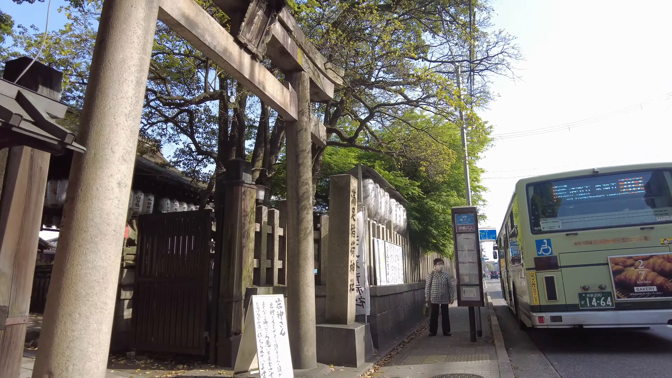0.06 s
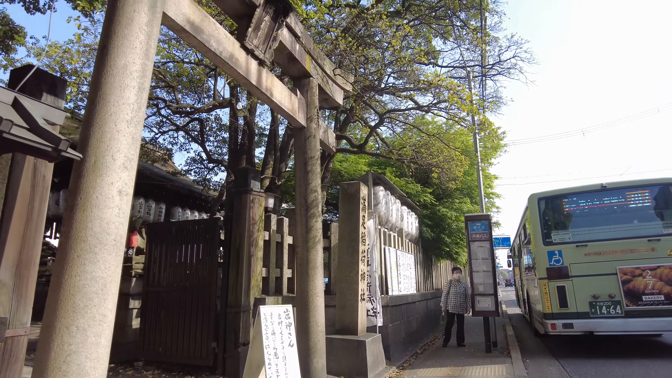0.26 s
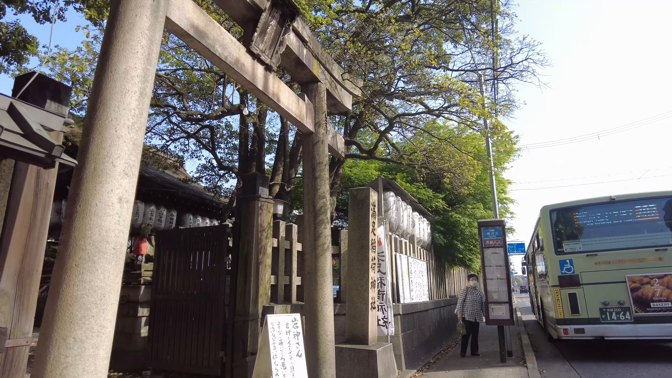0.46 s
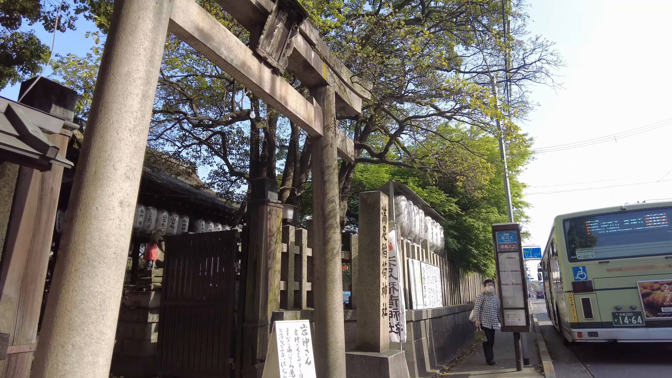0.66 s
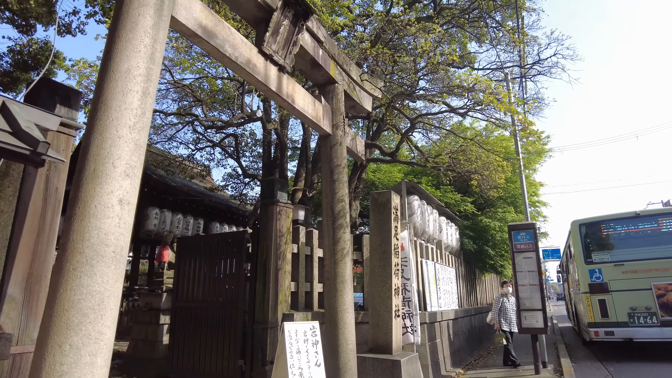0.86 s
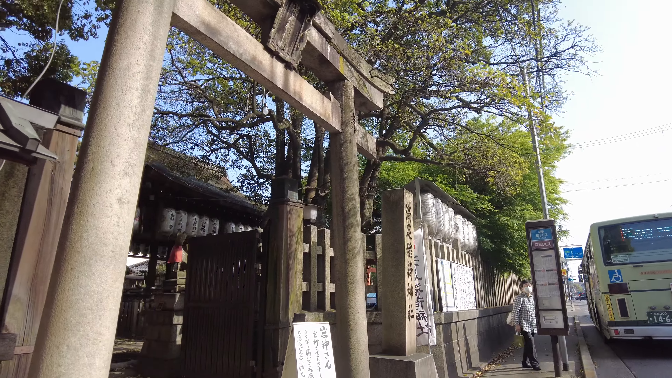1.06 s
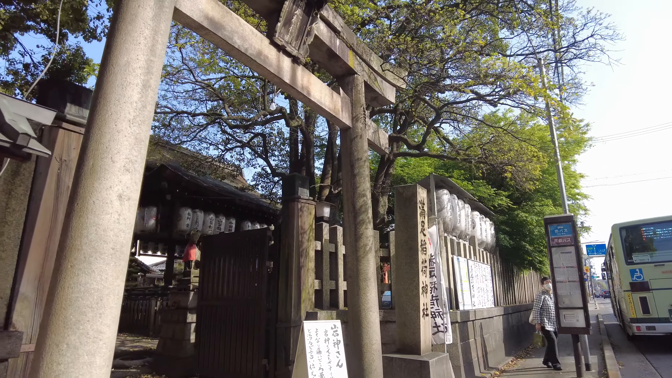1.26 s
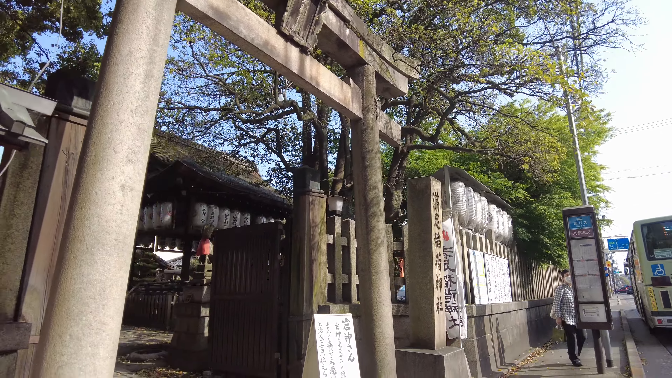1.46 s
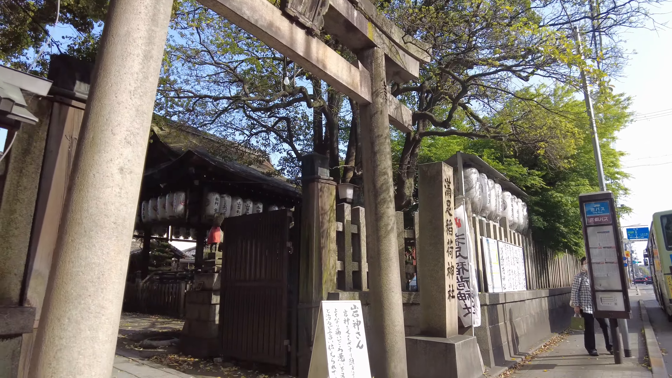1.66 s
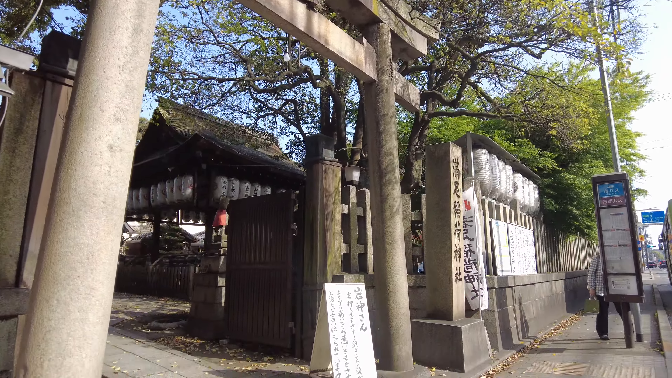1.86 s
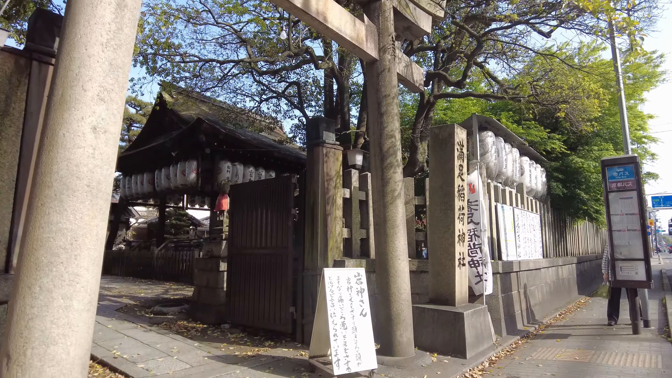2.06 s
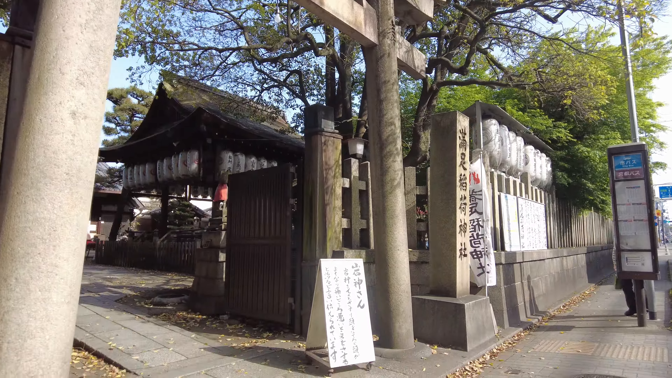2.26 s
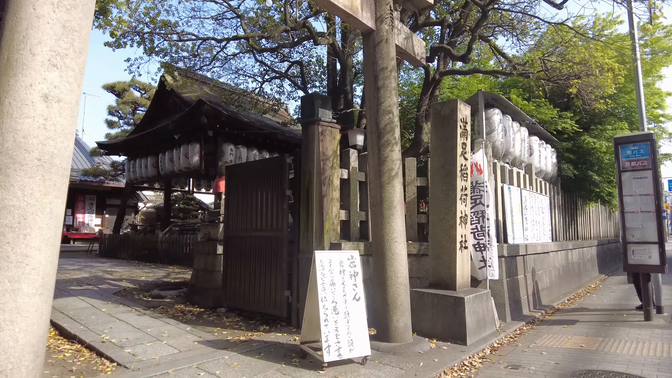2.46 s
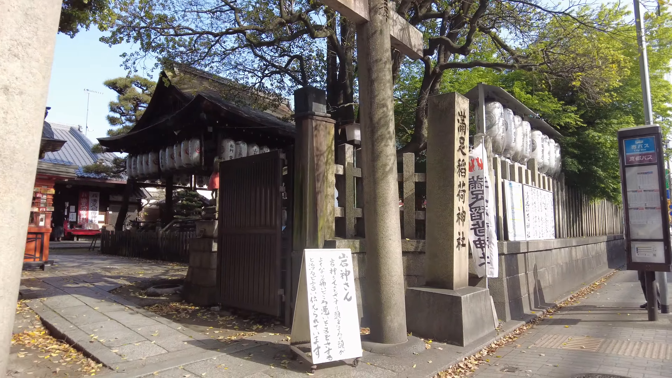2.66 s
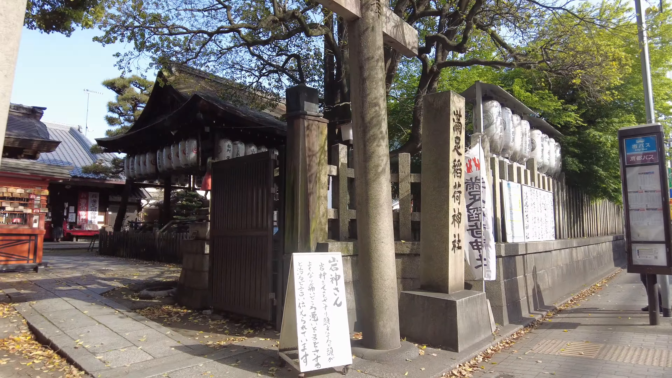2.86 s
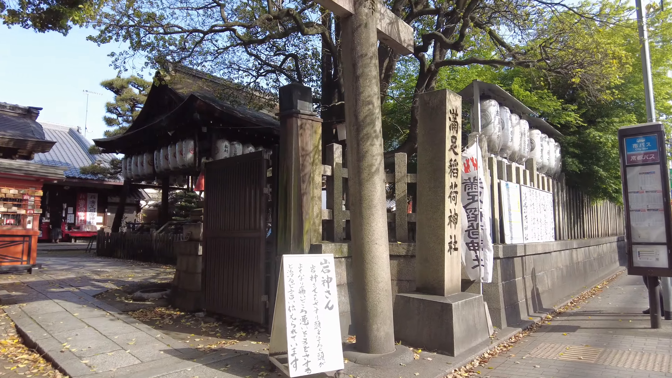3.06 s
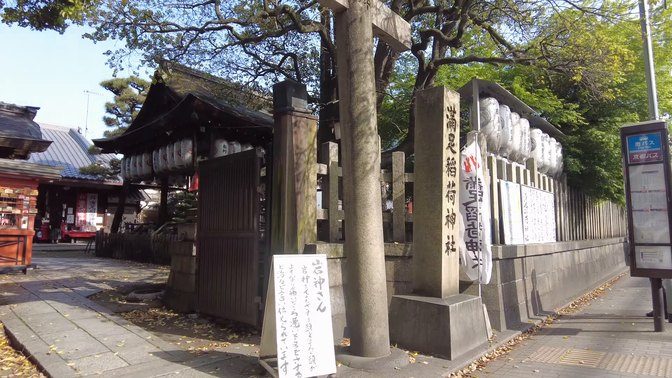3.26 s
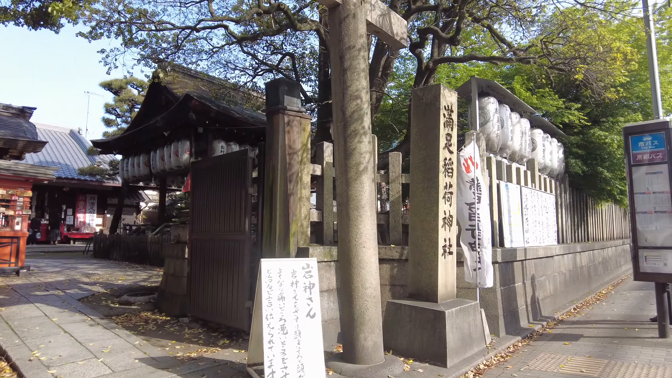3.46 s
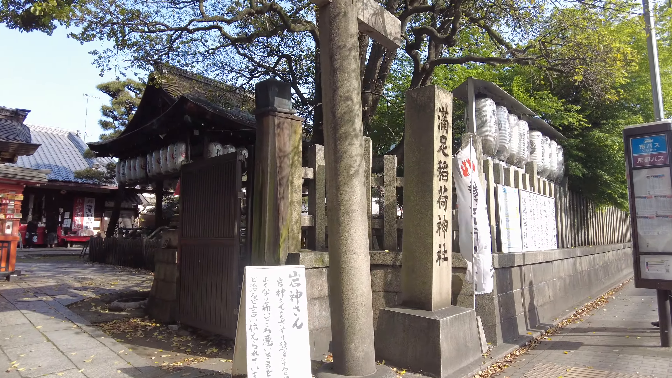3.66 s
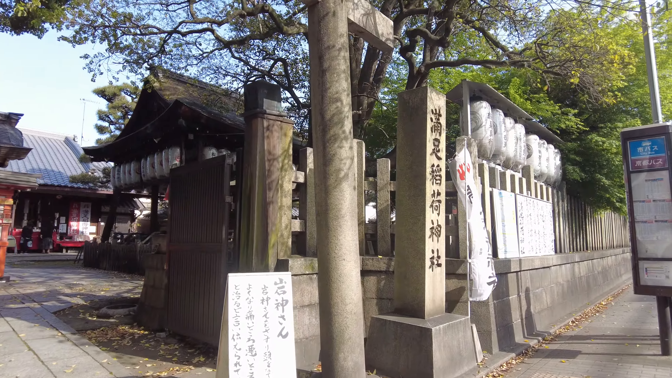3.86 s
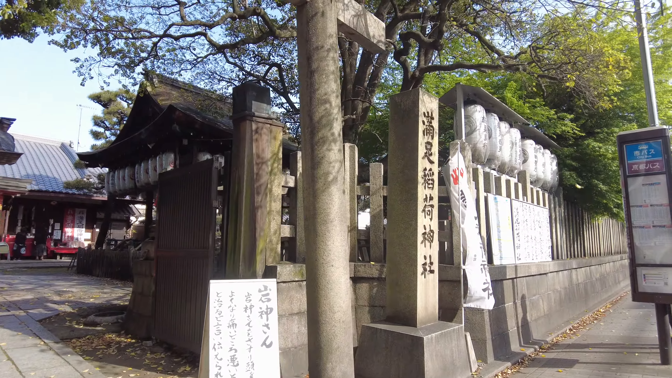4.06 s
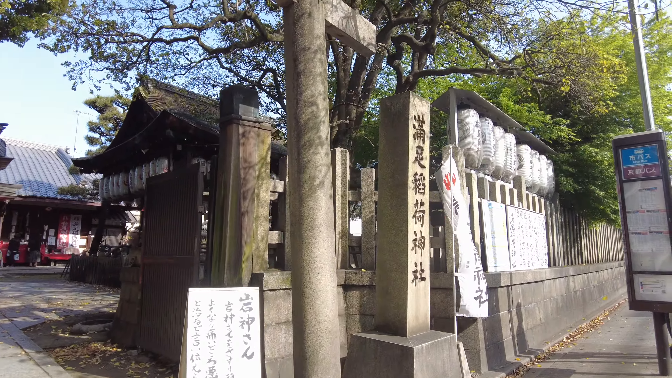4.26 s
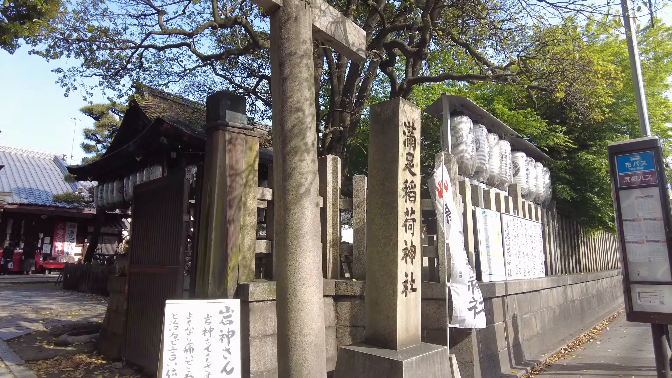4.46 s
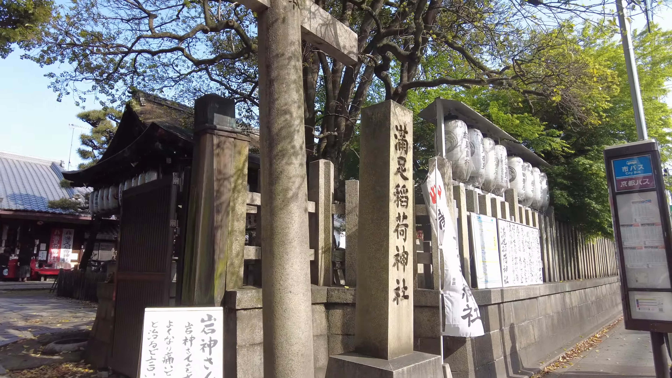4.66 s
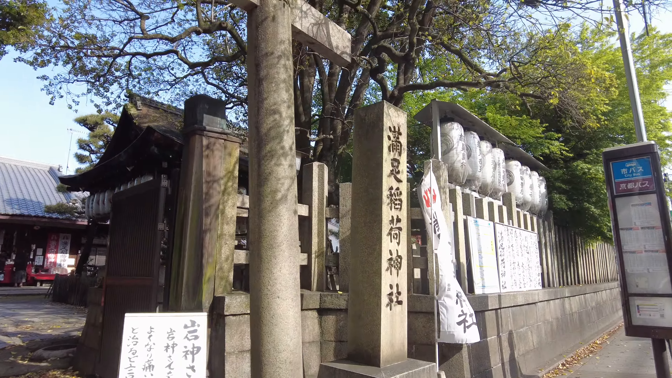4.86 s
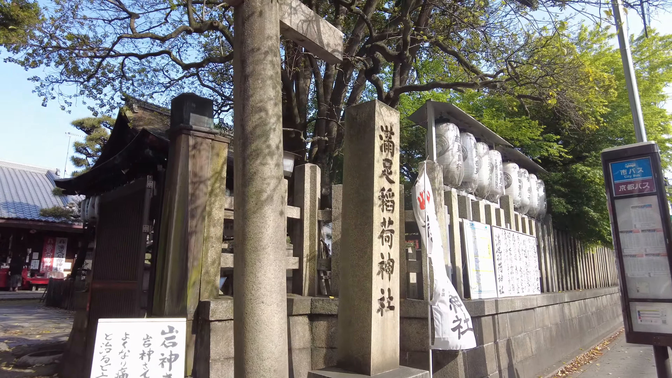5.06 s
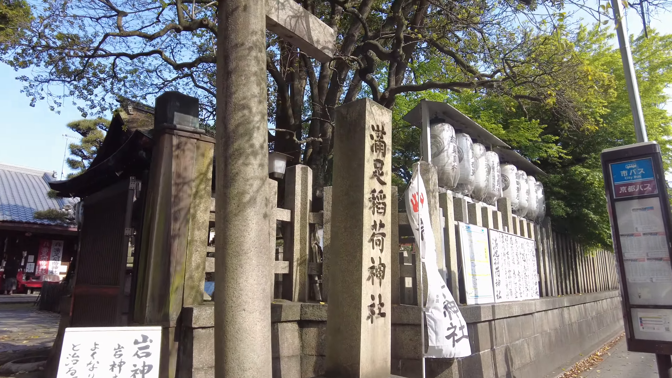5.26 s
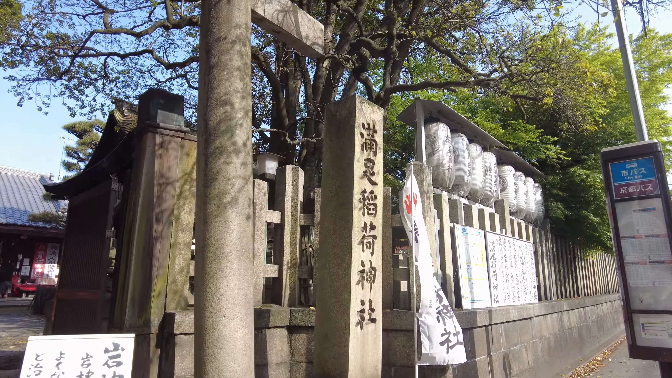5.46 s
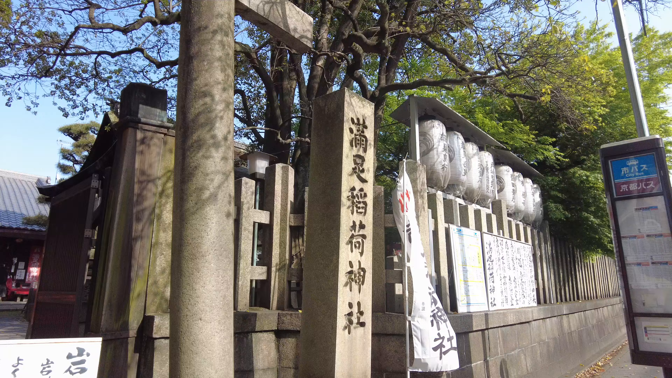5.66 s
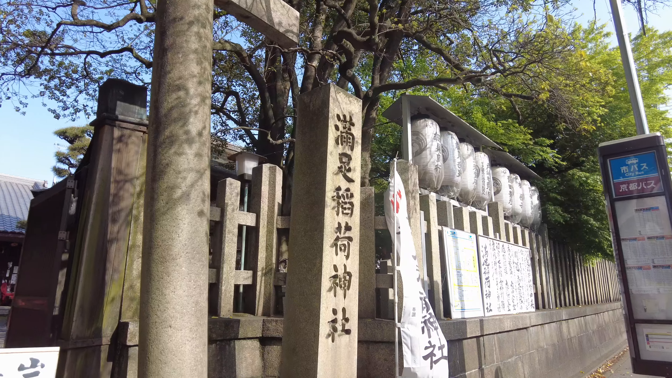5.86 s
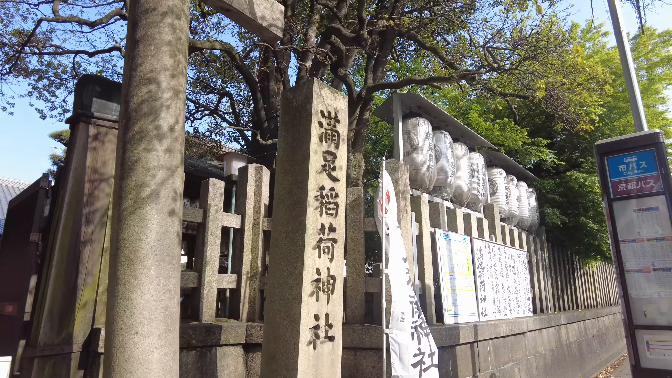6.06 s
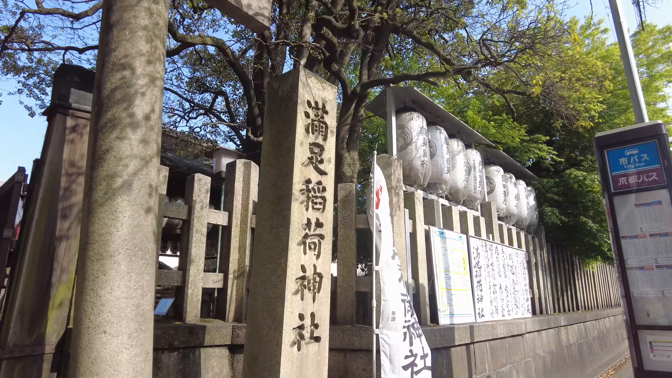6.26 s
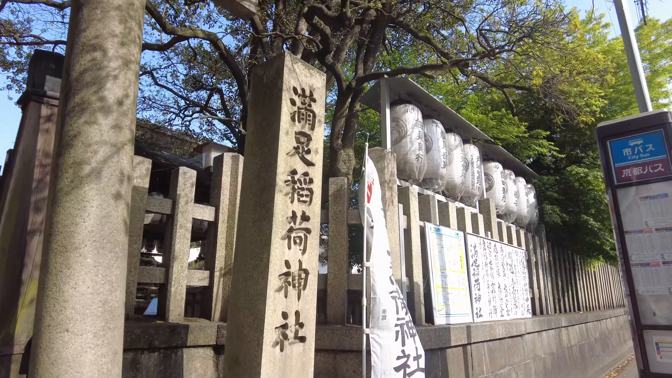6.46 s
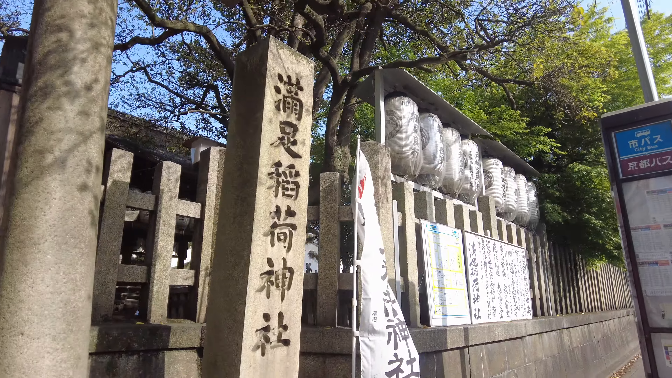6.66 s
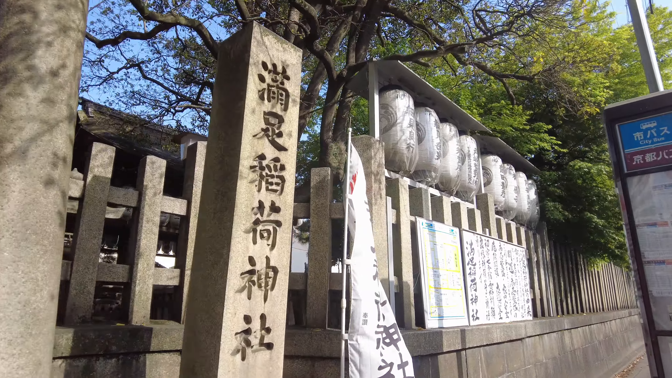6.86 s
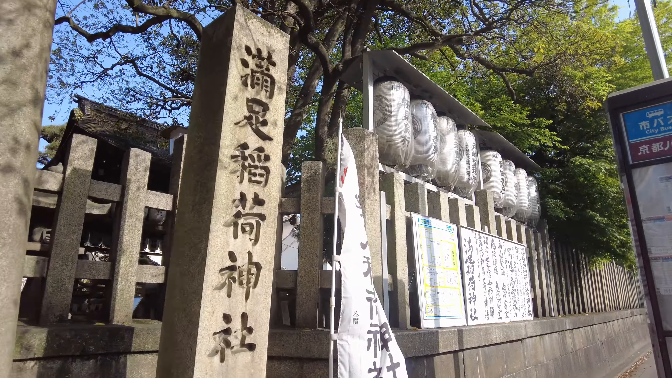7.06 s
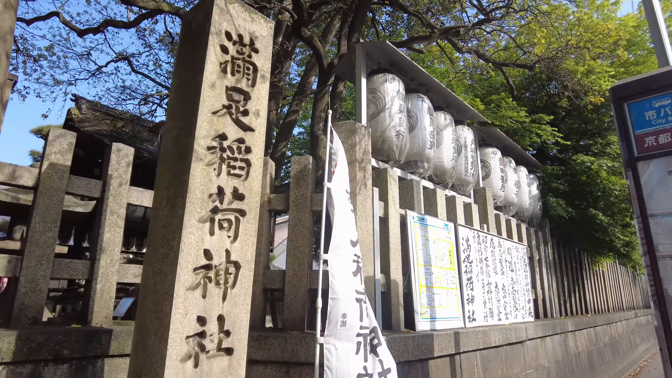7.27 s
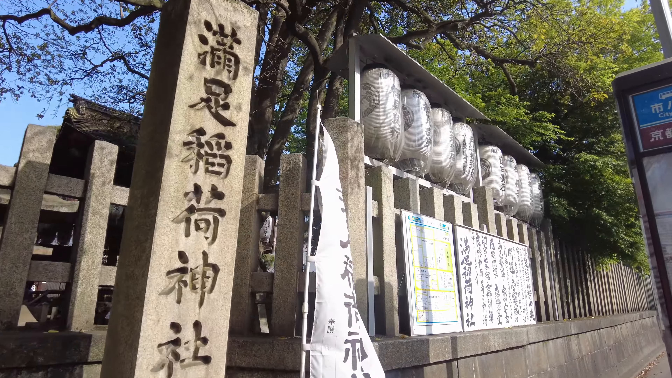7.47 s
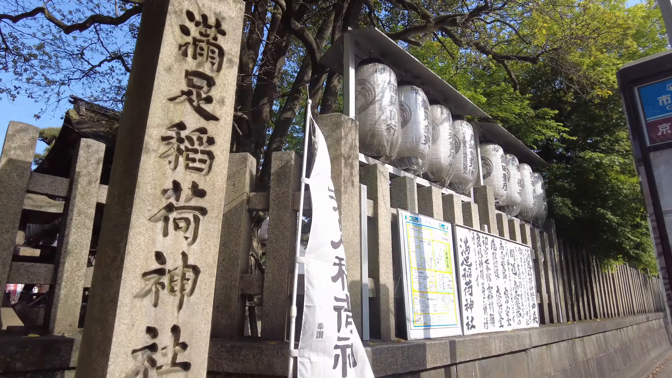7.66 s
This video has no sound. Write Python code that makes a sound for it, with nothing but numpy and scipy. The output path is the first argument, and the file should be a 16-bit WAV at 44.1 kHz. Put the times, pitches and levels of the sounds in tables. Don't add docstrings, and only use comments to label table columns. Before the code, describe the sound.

A city bus accelerates from its stop close to a handheld microphone: low exhaust drone, rumbling bodywork, fan rush and tyre hiss. It shifts gear and steadily weakens, with a car wash swelling mid-way. Then the bus roar is cut off, and only a thinning distant street rumble remains, with brittle leaf cracks near the end. Wide stereo collapses toward mono.

```python
import sys
import numpy as np
from scipy import signal
from scipy.fft import rfft, irfft, next_fast_len
from scipy.io import wavfile
from scipy.ndimage import uniform_filter1d

SR = 44100
rng = np.random.default_rng(int(sys.argv[2]) if len(sys.argv) > 2 else 0)


def invert_db(level):
    return 10 ** (np.asarray(level, dtype=float) / 20)


def digitize_waveform(pressure):
    field = np.atleast_2d(pressure).T
    bounded = np.clip(field, -1, 1)
    quanta = np.round(bounded * 32767).astype(np.int16)
    wavfile.write(sys.argv[1], SR, quanta)


N = 340452
SIZE = next_fast_len(N, True)
HZ = np.fft.rfftfreq(SIZE, 1 / SR)
TIME = np.arange(N) / SR


def curves(table):
    s, *columns = np.transpose(table)
    return [np.interp(TIME, s, c) for c in columns]


def over_hz(table):
    hz, *columns = np.transpose(table)
    return [np.interp(np.log(HZ + 1), np.log(hz), c) for c in columns]


def walk(rate_hz):
    hold = int(SR / rate_hz)
    steps = np.repeat(rng.standard_normal(N // hold + 1), hold)
    return 1.53 * uniform_filter1d(uniform_filter1d(steps, hold), hold)[:N]


def ramp(start_s, length_s):
    return np.clip((TIME - start_s) / length_s, 0, 1)


def gate(start_s, end_s, edge_s):
    return ramp(start_s - edge_s / 2, edge_s) * (1 - ramp(end_s - edge_s / 2, edge_s))


def bump(centre_s, half_s):
    return np.exp(-((TIME - centre_s) / half_s) ** 2)


def quadrature(x):
    return np.imag(signal.hilbert(x, SIZE)[:N])


# start_s, end_s, depth_db
LIFTS = [
    (2.067, 2.229, -12),
    (3.037, 3.438, -12),
    (4.037, 4.113, -5.5),
    (4.85, 4.934, -14.5),
    (5.127, 5.203, -4),
    (5.743, 5.954, -16),
    (6.45, 6.751, -5),
    (7.2, 7.9, -26),
]


def lifts_db():
    edge_s = 0.16
    return sum(depth_db * gate(start_s, end_s, edge_s) for start_s, end_s, depth_db in LIFTS)


# start_s, firing_hz, level_db
EXHAUST_NOTE = [(0, 71.7, -14.5), (.3, 71.5, -18), (.6, 73.74, -16), (.9, 76.4, -19.5), (1.1, 77.6, -15.5),
                (1.35, 78.5, -16.5), (1.55, 81.1, -12), (1.95, 79.4, -18), (2.25, 73.97, -15.5),
                (2.9, 70.43, -17.5), (3.5, 69.53, -27.5), (3.8, 69.1, -22), (4.33, 69.67, -20.5),
                (4.65, 67.2, -26.5), (5.05, 63.54, -25.5), (5.55, 64.2, -33), (6.2, 67.3, -37),
                (7.72, 68.7, -44.5)]
# multiple_of_firing_rate, level_db
FIRING_ORDERS = [
    (1.5, -1),
    (2, -1.5),
    (2.5, -8.5),
    (3, -11.5),
    (4, -12),
]
# start_s, level_db
OVERTONE_LEVEL = [
    (0, -31),
    (.8, -29.5),
    (1.25, -34.5),
    (2.1, -50.5),
    (2.8, -45.5),
    (3.5, -38.5),
    (4.5, -44.5),
    (5.5, -50),
    (7.72, -68),
]
# centre_s, peak_db, half_length_s
BOOM_SWELLS = [(.19, -20, 0.23), (0.54, -30, 0.13), (0.87, -20.5, 0.087), (1.083, -16.5, 0.037),
               (1.27, -21, 0.07), (1.55, -25, 0.17), (1.92, -31, 0.046), (2.1, -30, 0.072),
               (2.323, -25, 0.051), (2.644, -27.5, 0.17), (2.983, -33, .06), (3.2, -30, 0.18),
               (3.85, -35.5, 0.44), (4.118, -29, 0.045), (4.505, -38, 0.079), (4.75, -27, 0.14),
               (5.003, -28.5, 0.11), (5.2, -29.5, 0.15), (5.5, -36, 0.11)]


def engine():
    start_turns = 0.24
    firing_hz, level_db = curves(EXHAUST_NOTE)
    phase = 2 * np.pi * (np.cumsum(firing_hz) / SR + start_turns)
    far = ramp(4.4, 1)
    hum_db = level_db + lifts_db() + (.6 + 2.4 * far) * walk(18)
    hum = invert_db(hum_db) * np.sin(phase + (.05 + .5 * far) * walk(15))

    blur = np.clip(TIME / 1.6, .35, 1)
    overtones = 0
    for multiple, order_db in FIRING_ORDERS:
        level = invert_db(order_db + 3.0 * blur * walk(7))
        overtones = overtones + level * np.sin(multiple * phase + .9 * blur ** 2 * walk(12))
    overtones = overtones * invert_db(curves(OVERTONE_LEVEL)[0] + 0.15 * lifts_db())

    locked_s, free_hz, sag_hz_per_s = 0.78, 37.1, .8
    boom_hz = np.where(TIME < locked_s, firing_hz / 2, free_hz - sag_hz_per_s * TIME)
    boom_phase = 2 * np.pi * (np.cumsum(boom_hz) / SR + start_turns) + 1.2 * blur ** 2 * walk(19)
    swells = sum(invert_db(peak_db) * bump(centre_s, half_s) for centre_s, peak_db, half_s in BOOM_SWELLS)
    return np.sqrt(2) * (hum + overtones + swells * np.sin(boom_phase)), phase


# arrives_s, leaves_s, strength_0_to_1
CARS = [
    (1.753, 2.155, 0.56),
    (2.504, 3.1, 0.05),
    (3.873, 5.603, 0.97),
]


def bus_swell(parts, hidden):
    near_db, launch_db, launch_s, lift_share = 4, 1.5, 0.22, 0.071
    rest_hz, car_edge_s, wall_db = 71.9, 0.29, -13
    revs_hz = curves(EXHAUST_NOTE)[0] - rest_hz
    cars = sum(strength * gate(arrives_s, leaves_s, car_edge_s) for arrives_s, leaves_s, strength in CARS)
    common = near_db + launch_db * np.exp(-TIME / launch_s) + lift_share * lifts_db()
    swells = []
    for (_, fade, rev, car), (from_s, over_s) in zip(parts, hidden):
        swells.append(common + fade * TIME + rev * revs_hz + car * cars + wall_db * ramp(from_s, over_s))
    return swells


# centre_s, change_db, half_length_s, around_hz
SURGES = [(0.16, -0.5, 0.2, 1900), (1.893, 5.5, .1, 10700), (2.2, 1, .2, 14200), (2.2, 0, .2, 7000),
          (0.52, -4, 0.2, 650), (5.8, -1, 0.087, 870), (.1, -0.5, 0.27, 11000), (0.089, 3.5, .2, 4600),
          (0.66, -4.5, .25, 7500), (1.7, -4.5, 0.2, 820), (1.7, 4, 0.13, 670), (2.31, -7.5, 0.17, 211),
          (6.4, 3, 0.1, 6000), (6.03, -4.5, 0.37, 390), (4.25, 3.5, 0.22, 1300), (3.6, -2.5, 0.087, 280),
          (0.05, -3.5, 0.11, 190), (2.75, 5, .15, 94), (1.15, 5.5, 0.2, 240), (1.02, 3.5, 0.35, 1550),
          (1.3, 6.5, 0.48, 614), (1.48, -5.5, 0.4, 780), (1.385, -0.5, .15, 170), (2.9, 2, 0.4, 9300),
          (2.2, 3, 0.13, 840), (2.78, 0, .15, 710), (3.56, 5, 0.17, 860), (4.37, 1.5, 0.48, 1000),
          (4.5, -4, 0.11, 1100), (4.85, 4.5, 0.066, 1100), (3.22, -4.5, 0.099, 199), (4.43, 4.5, 0.28, 353),
          (5.087, 12.5, 0.11, 141), (5.1, 1, 0.09, 730), (5.59, 4, 0.25, 1530), (2.07, -1, 0.28, 1500),
          (2.31, -5.5, 0.54, 510), (0.29, -3, 0.56, 310), (5.59, 3, 0.26, 650), (6.95, -8, .12, 1700),
          (7.5, -16, 0.64, 78), (4.7, 0, 0.39, 780)]


def surges_db(hz):
    octaves = 0.29
    total = 0
    for centre_s, change_db, half_s, around_hz in SURGES:
        near_db = change_db * np.exp(-np.log2(hz / around_hz) ** 2 / octaves ** 2)
        if abs(near_db) > .05:
            total = total + near_db * bump(centre_s, half_s)
    return total


# pitch_hz, likeness_0_to_1, right_lead_rad, right_minus_left_db
PORTS = [(40, .95, 0, 4), (60, .99, .15, .6), (200, .9, .3, 0), (300, .85, .55, -.5), (430, .3, .6, -.5),
         (600, .5, 1.9, -.5), (880, .82, 3.1, -.3), (1180, .75, 4, 0), (1220, .8, .25, 1),
         (1600, .72, .7, 1.7), (2500, .55, 1.5, 2.6), (3600, .2, 1.6, 1.8), (4300, .3, 2.2, 2.3),
         (4700, .5, 3.1, 1.2), (5400, .3, 3.4, 2.4), (7000, .15, 3.7, 2.4), (12000, .3, 6.8, 2.9)]


def roar(colour, swells_db, parts, patchy_db, flicker_db, throb_db):
    likeness = over_hz(PORTS)[0]
    left, other = rfft(rng.standard_normal((2, SIZE)))
    pair = np.array([left, likeness * left + np.sqrt(1 - likeness ** 2) * other])
    pair = pair * invert_db(over_hz(colour)[0]) * np.sqrt(SR / 2)
    swells_db = np.array(swells_db)
    third = 3 * np.log2(HZ + 1)
    first = int(3 * np.log2(colour[0][0])) - 1
    last = 3 * np.log2(colour[-1][0]) + 1
    part_thirds = 3 * np.log2(np.transpose(parts)[0])
    out = 0
    for centre in np.arange(first, last):
        share = np.clip(1 - np.abs(third - centre), 0, 1)
        place = np.interp(centre, part_thirds, np.arange(3))
        weights = np.clip(1 - np.abs(place - np.arange(3)), 0, 1)
        ridges_db = patchy_db * walk(3.512) + flicker_db * walk(11)
        level_db = weights @ swells_db + ridges_db + throb_db + surges_db(2 ** (centre / 3))
        out = out + invert_db(level_db) * irfft(pair * share, SIZE)[:, :N]
    return out


# pitch_hz, level_db_per_hz
BAY_COLOUR = [(25, -52), (50, -49.5), (100, -50), (140, -50.5), (200, -56), (290, -54), (400, -63),
              (640, -61), (800, -62.5), (1100, -65.5), (1200, -70.5), (1400, -81)]
# pitch_hz, fade_db_per_s, revs_db_per_hz, car_lift_db
BAY_PARTS = [
    (228, -2.5, -0.09, -0.5),
    (585, -3.5, .5, 2.5),
    (1020, -1.5, 0.01, 1.5),
]
# from_s, over_s
BAY_HIDDEN = [
    (4.8, 0.12),
    (4.73, 0.23),
    (4.68, 0.31),
]


def engine_bay(phase):
    return roar(BAY_COLOUR, bus_swell(BAY_PARTS, BAY_HIDDEN), BAY_PARTS,
                patchy_db=2.0, flicker_db=1.36, throb_db=0.5 * np.sin(phase))


# pitch_hz, level_db_per_hz
FAN_COLOUR = [(1050, -82), (1250, -67.5), (1700, -70.5), (2300, -75.5), (3300, -79), (4200, -80),
              (4800, -83.5), (5900, -83.5), (7000, -88), (8000, -90.5), (10000, -95), (11500, -99),
              (13000, -100), (15500, -102.5)]
# pitch_hz, fade_db_per_s, revs_db_per_hz, car_lift_db
FAN_PARTS = [
    (1540, -2, 0.057, 6.6),
    (2380, -2.5, -0.033, 5.2),
    (9000, -3, 0.055, 0.66),
]
# from_s, over_s
FAN_HIDDEN = [
    (4.93, .08),
    (5.2, 0.38),
    (5.3, .3),
]


def fan_and_tyres(phase):
    return roar(FAN_COLOUR, bus_swell(FAN_PARTS, FAN_HIDDEN), FAN_PARTS,
                patchy_db=.8, flicker_db=.6, throb_db=.5 * np.sin(phase))


# pitch_hz, level_db_per_hz
STREET_COLOUR = [(25, -62), (60, -53), (130, -58.5), (290, -62.5), (400, -70), (650, -71), (1000, -73.5),
                 (1500, -75.5), (2200, -87.5), (3600, -95), (4400, -96), (6200, -100), (7000, -106),
                 (15500, -121)]
# pitch_hz, far_car_s, far_car_db, thinning_db_per_s
STREET_PARTS = [
    (200, 6.72, 1, -1.3),
    (1460, 5.7, 0, -1.35),
    (2400, 5.4, 1.3, -1.4),
]


def street():
    far_car_s = 0.44
    swells_db = []
    for _, centre_s, car_db, thinning in STREET_PARTS:
        swells_db.append(car_db * bump(centre_s, far_car_s) + thinning * np.clip(TIME - centre_s, 0, None))
    return roar(STREET_COLOUR, swells_db, STREET_PARTS, patchy_db=.9, flicker_db=.8, throb_db=0)


# pitch_hz, width_hz, start_s, end_s, level_db
RINGS = [(1234, 79, 3, 4.72, -48.5), (1235, 110, 3, 3.5, -54), (1370, 100, 3, 3.65, -46),
         (1400, 120, 4.5, 5.7, -53), (289.5, 15.5, 0.6, 2.05, -36), (259, 24, 0.5, 0.67, -38),
         (1603, 140, 4.5, 4.96, -46.5), (1620, 100, 1.9, 2.6, -51), (2500, 220, 0.8, 3.2, -58),
         (680, 62, 5.5, 6.6, -51.5), (1347, 60, 7, 7.2, -55), (1260, 44, 5.95, 6.4, -54.5),
         (950, 50, 1, 3.4, -55), (830, 47, 4, 2.2, -51), (892, 46, 6.8, 7.3, -55),
         (1540, 54, 7.62, 7.8, -55), (274, 26.6, 6, 7.25, -53), (248.5, 17, 1.4, 2.05, -40),
         (820, 59, 5.12, 5.5, -49), (769, 50, 6, 4.2, -51), (299.5, 27, 2, 2.94, -41.5),
         (1490, 180, .9, 1.24, -44), (4350, 550, 4, 6, -69), (10200, 1100, 1, 2.2, -73),
         (140, 6.5, 2.5, 3.6, -42), (128.5, 7.2, -0.3, .9, -35.5), (7756, 600, 1, 5.2, -70)]


def rings():
    edge_s, flicker_db, wander = 0.071, 2.5, .012
    out = np.zeros(N)
    for hz, width_hz, start_s, end_s, level_db in RINGS:
        span = slice(max(int((start_s - edge_s) * SR), 0), int((end_s + edge_s) * SR))
        pole = np.exp(-np.pi * width_hz / SR)
        slow = signal.lfilter([1], np.poly([pole, pole]), rng.standard_normal((2, N))[:, span])
        phase = 2 * np.pi * np.cumsum(hz * (1 + wander * walk(4)[span])) / SR
        ring = slow[0] * np.cos(phase) + slow[1] * np.sin(phase)
        level = invert_db(level_db + flicker_db * walk(14)) * gate(start_s, end_s, edge_s)
        out[span] += level[span] * ring / ring.std()
    return out


# start_s, peak_db, ring_hz, length_ms
TICKS = [(4.2, -52, 12000, 1), (4.4, -53, 13000, 1), (4.58, -48, 11000, 1), (6.272, -56, 9000, 1),
         (6.278, -52, 9400, 4), (6.297, -45, 5500, 2.9), (6.403, -52, 8000, 4), (6.655, -62, 15000, 3),
         (7.5036, -58, 7000, 3), (6.479, -55, 12900, 2.7), (6.553, -59, 9600, 6), (6.667, -57, 11000, 1.5),
         (6.706, -58, 11000, 6), (6.7689, -34, 12000, .2), (6.7688, -49, 9200, .3), (6.7687, -40, 5600, .4),
         (7.298, -58, 8800, 6), (6.543, -53, 4980, 2), (6.7677, -50, 11000, .8), (6.782, -64, 13000, 18),
         (6.603, -63, 13000, 2), (6.3635, -53, 7700, 2), (7.02, -61, 8500, 6), (7.1125, -49, 8800, 0.85),
         (7.1126, -55, 18000, 1.2), (7.2118, -38, 8200, 1.3), (7.2117, -54, 17000, 1.2),
         (7.2119, -45, 4600, 0.86), (7.2156, -43, 8000, 1.5), (7.218, -43, 7600, 1.3),
         (7.2182, -54, 13000, 1), (7.2235, -53, 8200, 1), (7.254, -55, 6500, 1.8), (7.2605, -55, 6800, 2),
         (7.272, -49, 5600, 2), (7.2758, -53, 9514, 1.5), (7.2856, -51.5, 10000, .8),
         (7.285, -60, 12000, 14), (7.44, -66, 16000, 14), (7.358, -57, 12500, 5)]


def leaves():
    snap = 2.1
    out = np.zeros(N)
    t = np.arange(2400) / SR
    for start_s, peak_db, hz, length_ms in TICKS:
        band = signal.butter(2, [0.76 * hz, min(1.1 * hz, 15500)], "band", fs=SR, output="sos")
        impact = rng.standard_normal(len(t)) + snap * (t == 0)
        crack = signal.sosfilt(band, impact * np.exp(-t * 1000 / length_ms))
        i = int(start_s * SR)
        out[i:i + len(t)] += invert_db(peak_db) * crack / np.abs(crack).max()

    grains_per_s = 500
    grain_db = -71 + 3.5 * walk(12) - 5.0 * gate(6.2, 7.2, .05) + 2.6 * rng.exponential(size=N)
    grains = (rng.random(N) < grains_per_s / SR) * invert_db(grain_db) * (TIME > 6.2)
    return out + signal.sosfilt(signal.butter(2, 7000, "high", fs=SR, output="sos"), grains)


def scene():
    hum, phase = engine()
    bus = engine_bay(phase) + fan_and_tyres(phase)
    bus_left = 1 - ramp(5.75, 0.4)
    scatter = .17 * walk(6)
    hum = np.array([hum, hum + scatter * quadrature(hum)])
    return hum + bus_left * bus + street() + rings() + leaves()


def low_pass(x):
    return signal.sosfilt(signal.butter(12, 15760, fs=SR, output="sos"), x)


def record(dry):
    _, lead_rad, right_db = over_hz(PORTS)
    turn = invert_db(right_db) * np.exp(1j * lead_rad) - 1
    extra = rfft(dry[1] * ramp(0, 0.013), SIZE) * turn
    bass = 1 / (1 + (HZ / 220) ** 4)
    treble = HZ > 1200
    bands = np.array([bass, treble, 1 - bass - treble])
    low, high, middle = irfft(extra * bands, SIZE)[:, :N]
    middle = middle + .12 * walk(9) * quadrature(middle)
    bass_open = 1 - ramp(1.82, 0.33)
    treble_open = 0.86 + 0.14 * ramp(0, 1)
    steer = bass_open * low + middle + treble_open * high
    wide = 1 - ramp(5.27, 0.56)
    right = wide * (dry[1] + steer) + (1 - wide) * dry[0]
    top = signal.ellip(10, .2, 60, 15750, fs=SR, output="sos")
    mix = signal.sosfilt(top, [dry[0], right])
    return low_pass(mix)


dry = scene()
out = record(dry)
digitize_waveform(out)
```